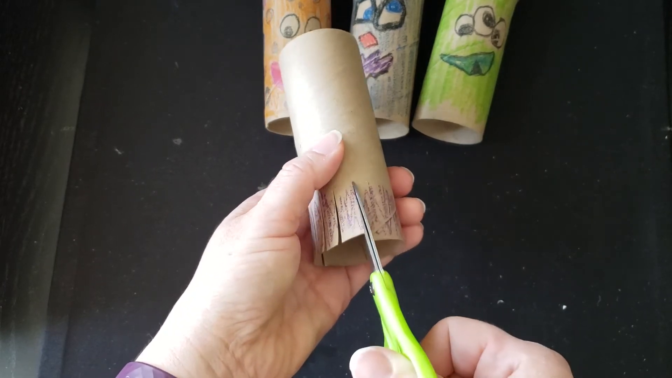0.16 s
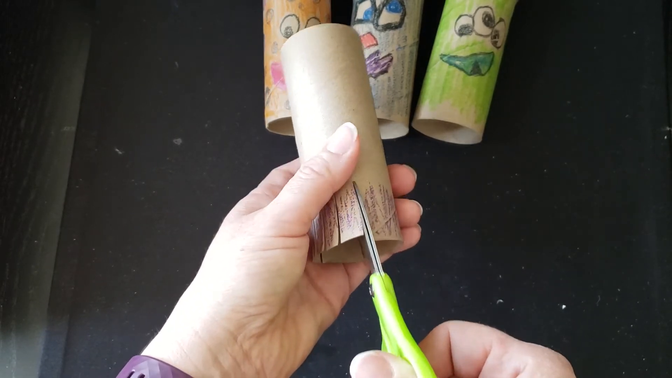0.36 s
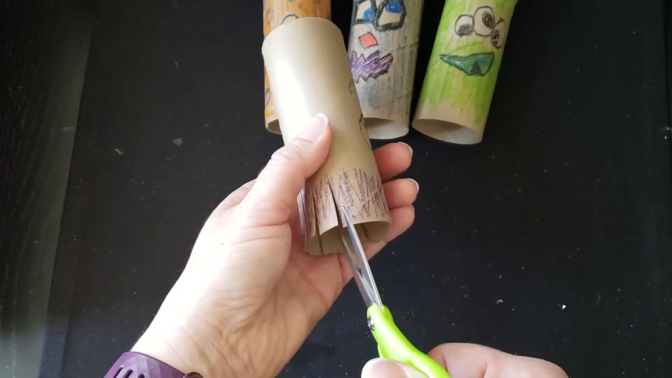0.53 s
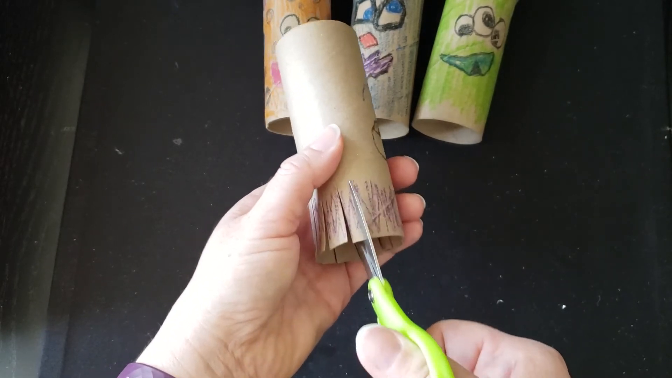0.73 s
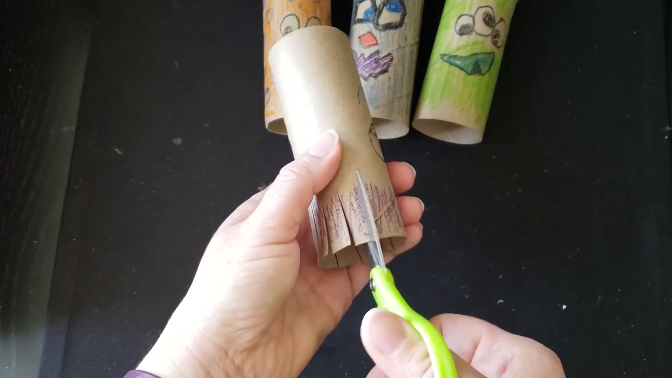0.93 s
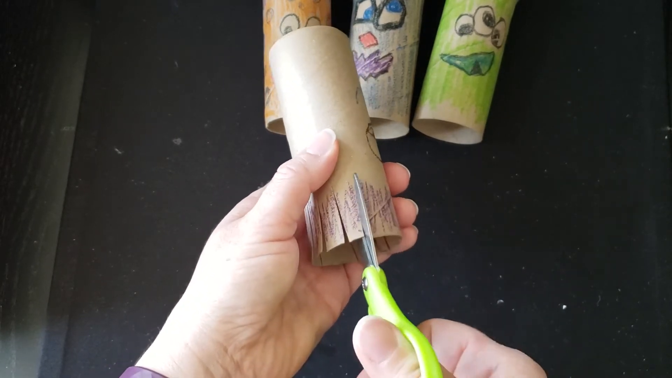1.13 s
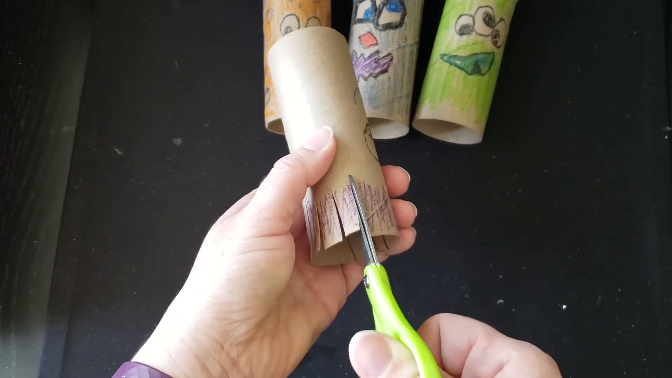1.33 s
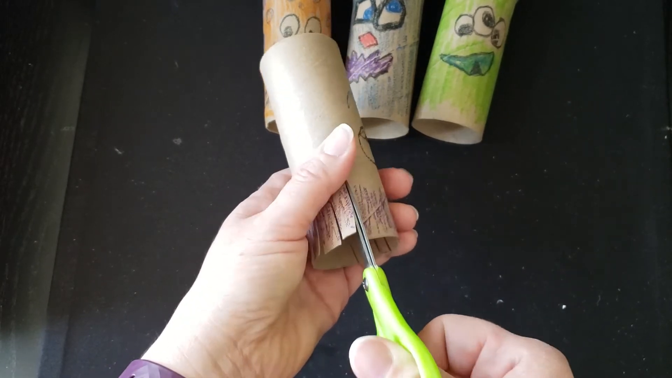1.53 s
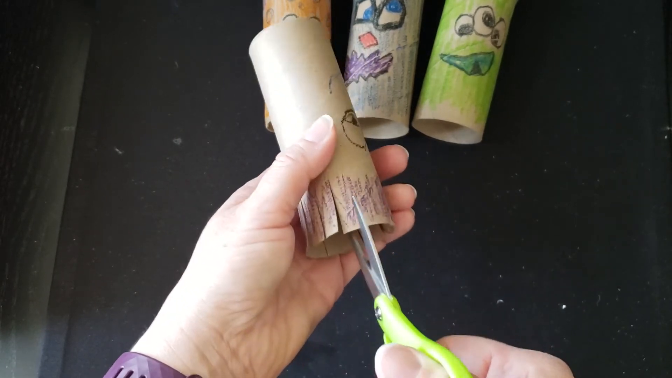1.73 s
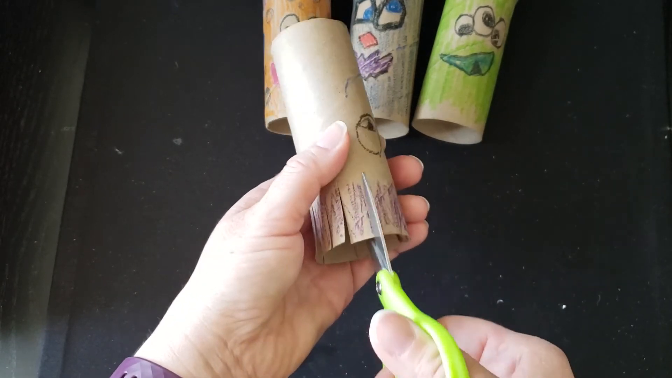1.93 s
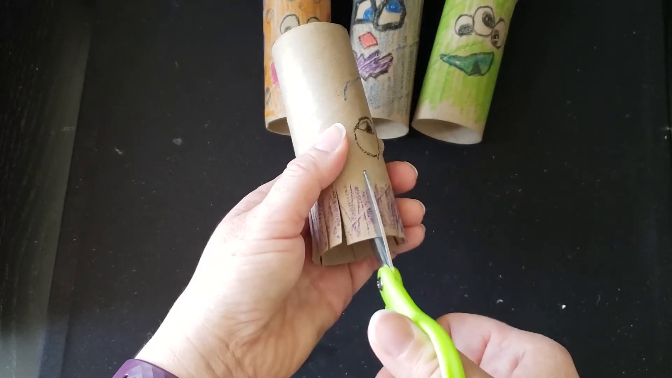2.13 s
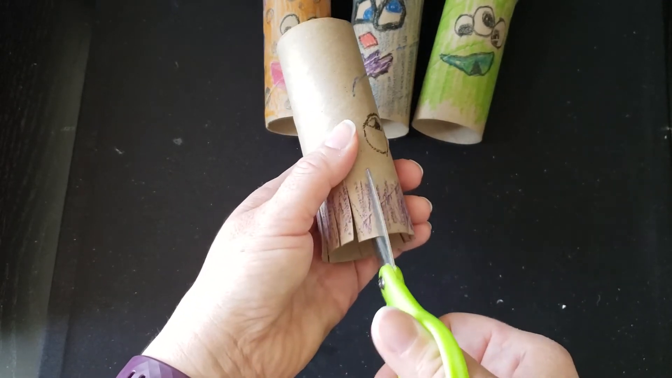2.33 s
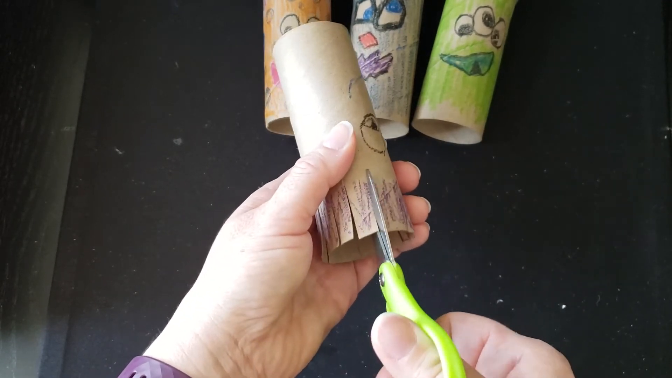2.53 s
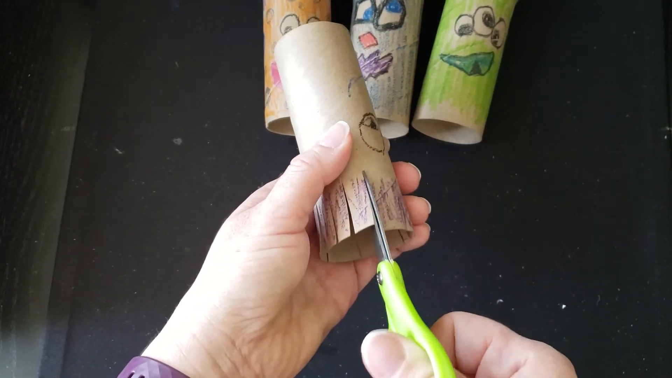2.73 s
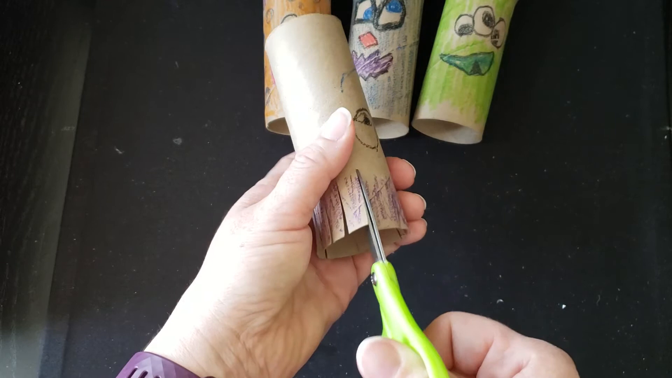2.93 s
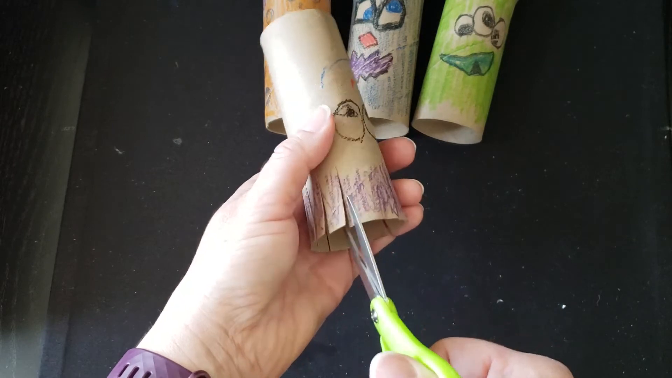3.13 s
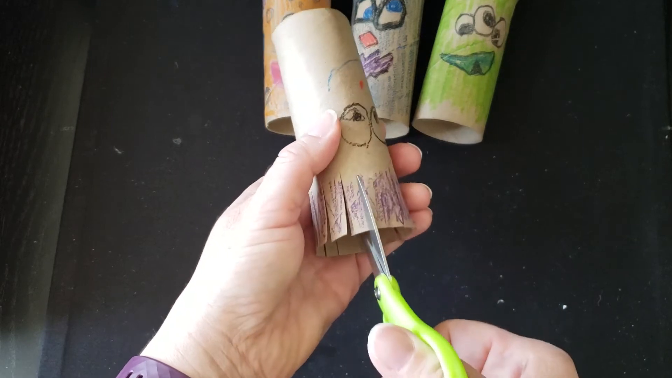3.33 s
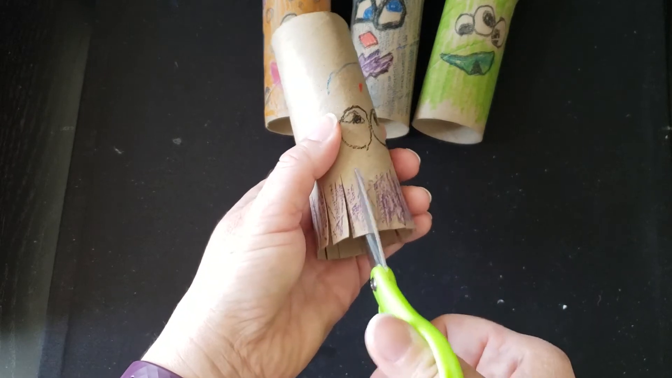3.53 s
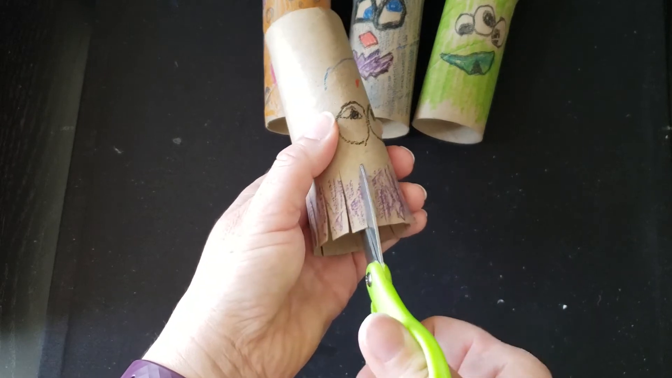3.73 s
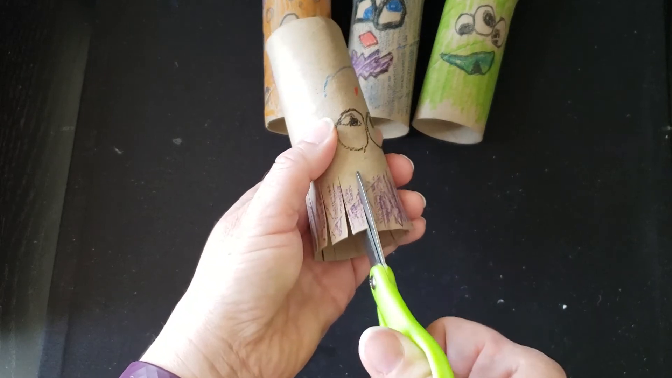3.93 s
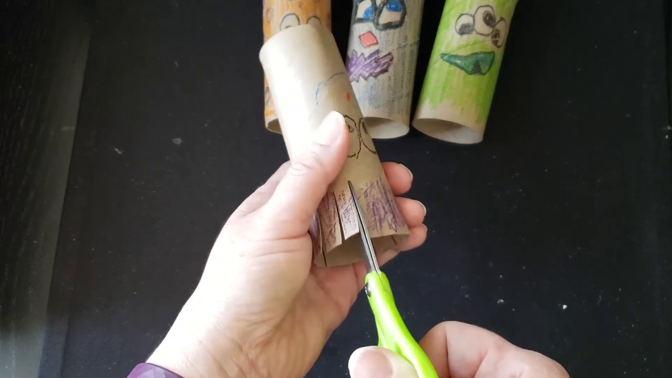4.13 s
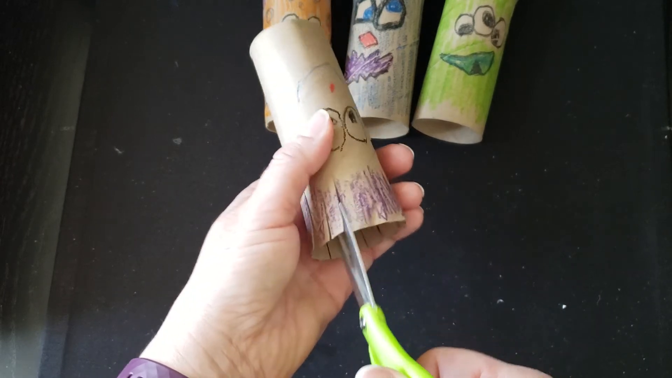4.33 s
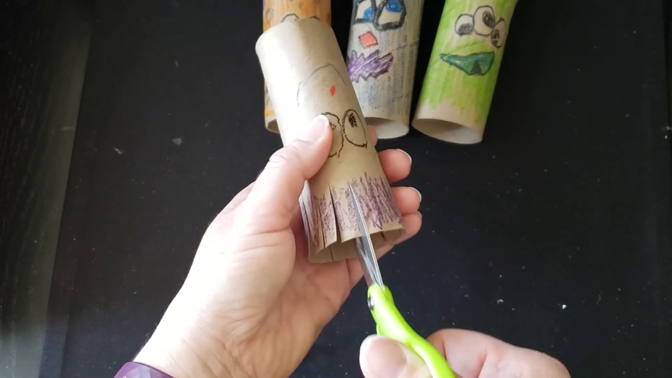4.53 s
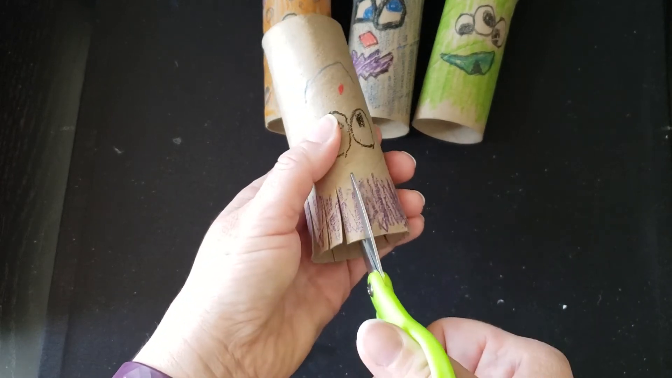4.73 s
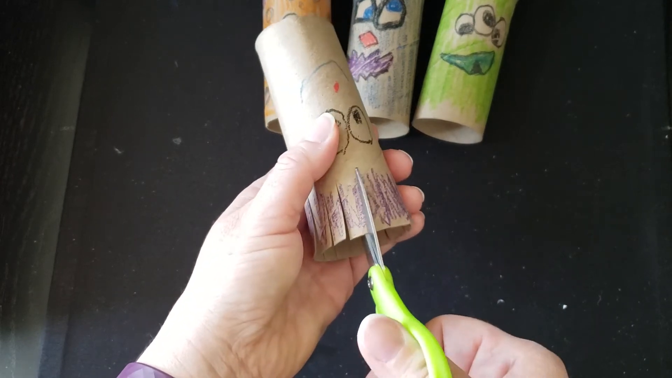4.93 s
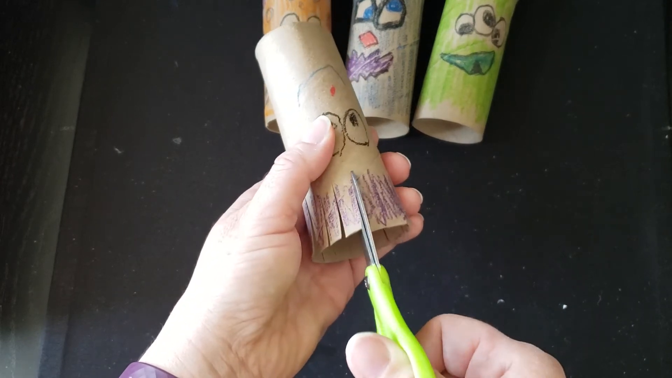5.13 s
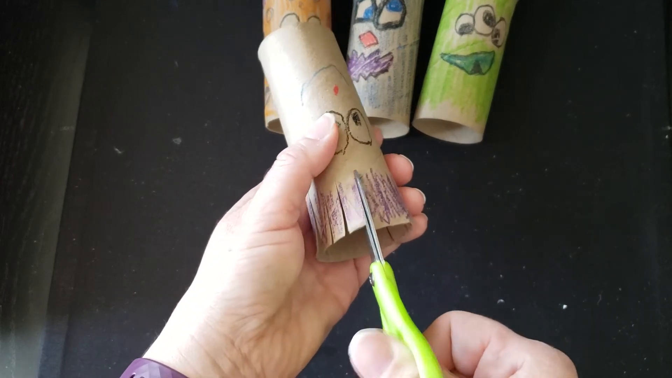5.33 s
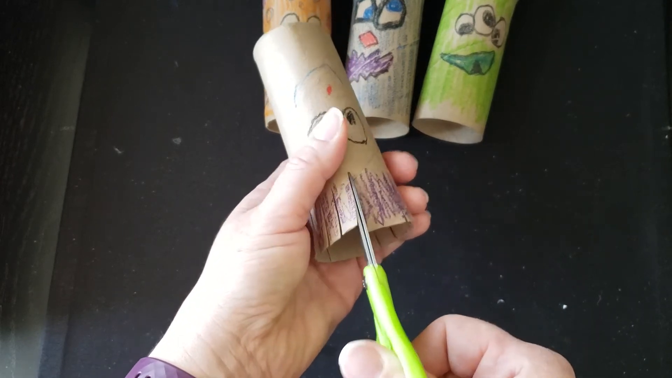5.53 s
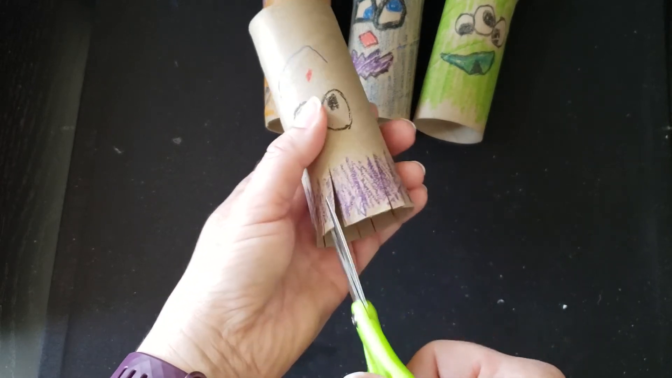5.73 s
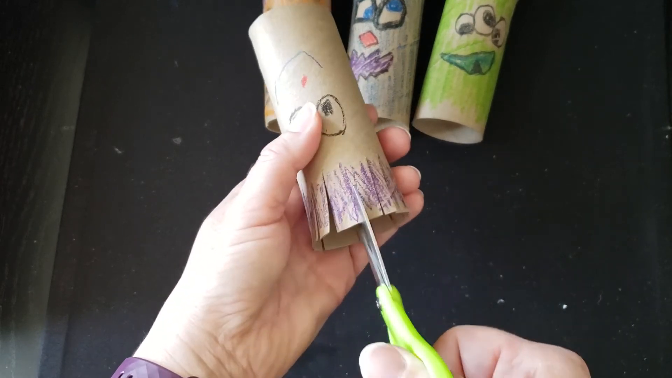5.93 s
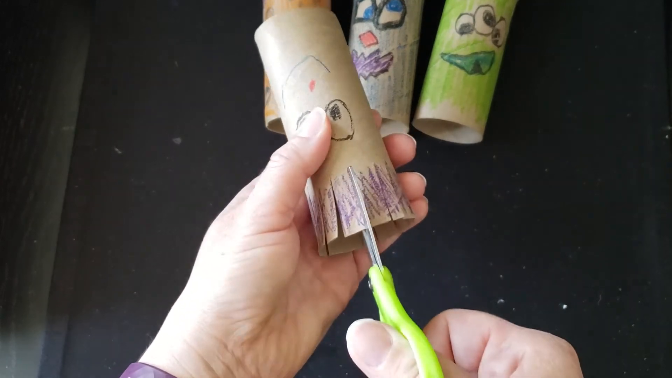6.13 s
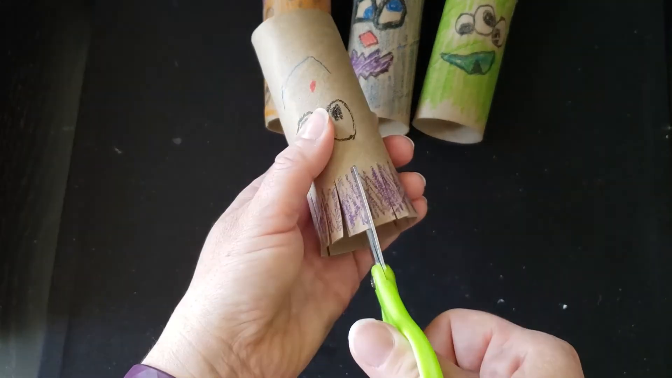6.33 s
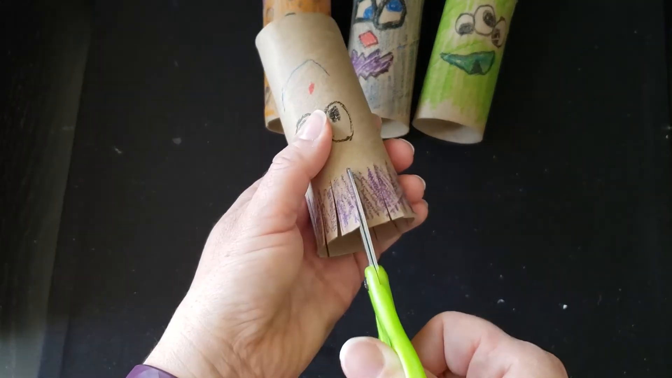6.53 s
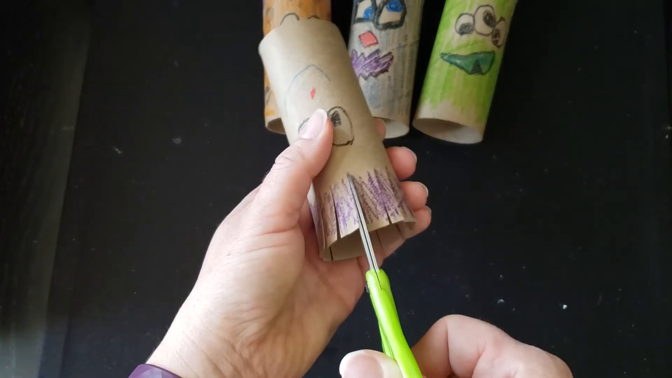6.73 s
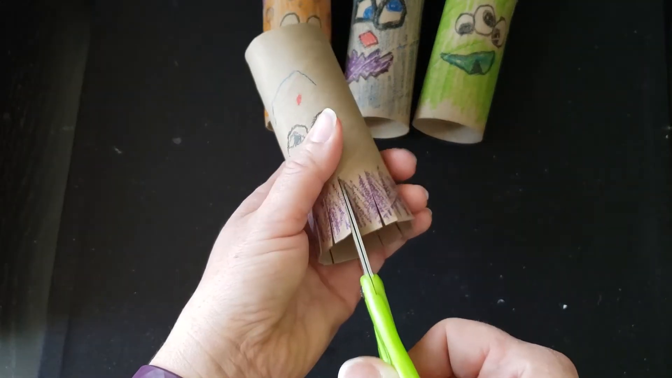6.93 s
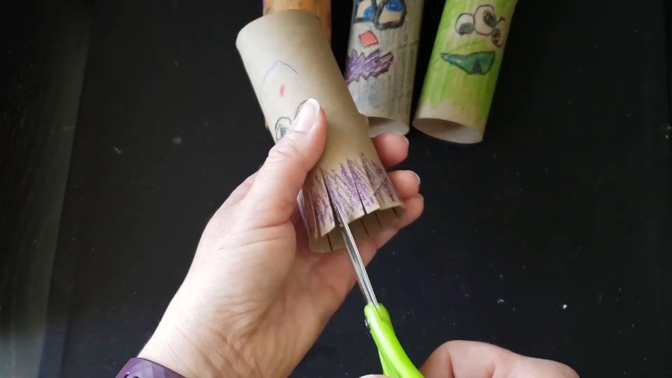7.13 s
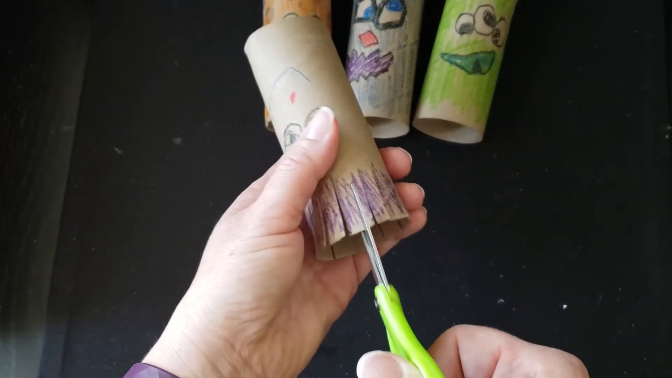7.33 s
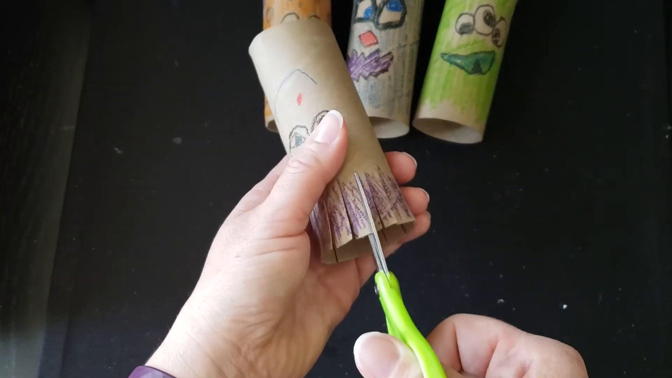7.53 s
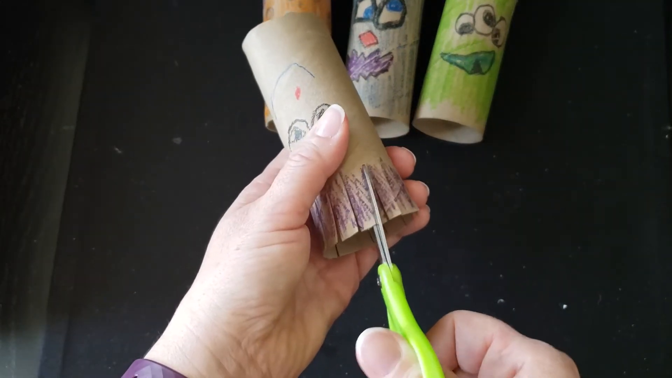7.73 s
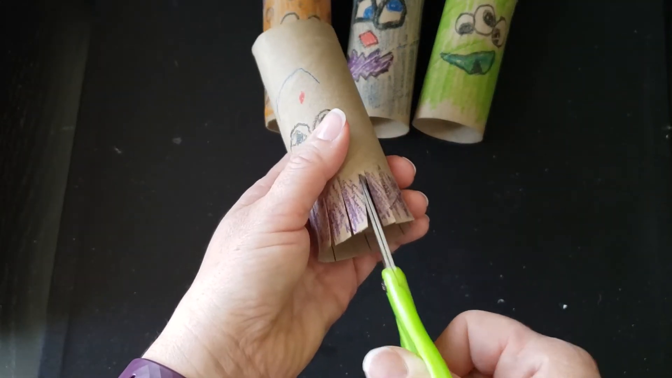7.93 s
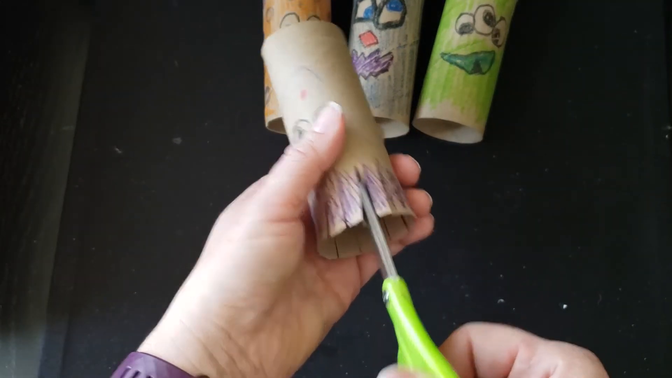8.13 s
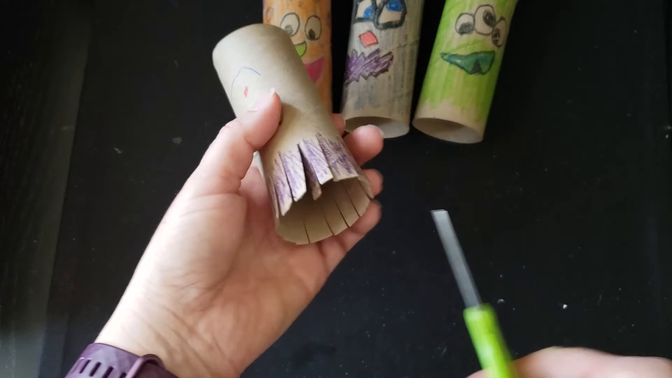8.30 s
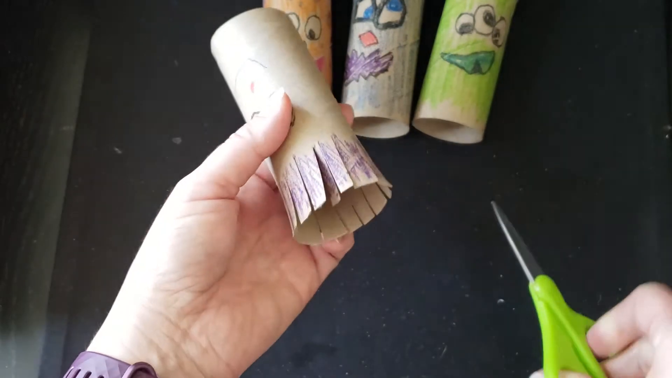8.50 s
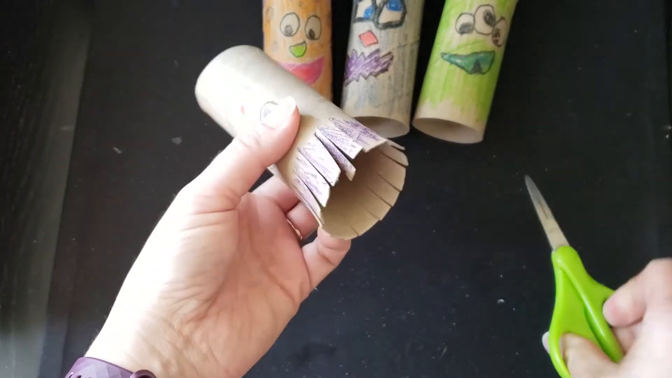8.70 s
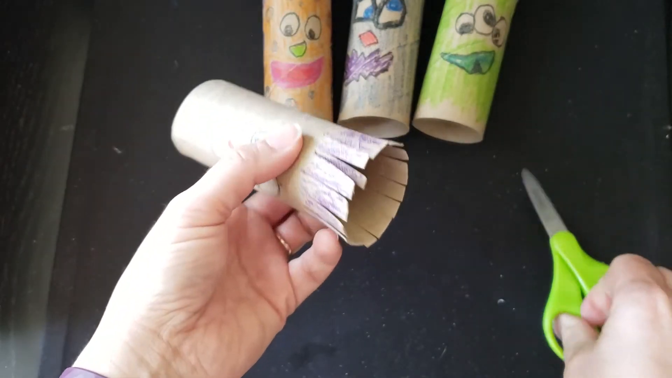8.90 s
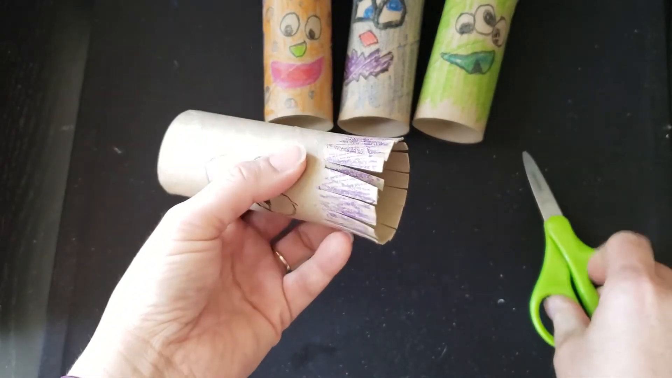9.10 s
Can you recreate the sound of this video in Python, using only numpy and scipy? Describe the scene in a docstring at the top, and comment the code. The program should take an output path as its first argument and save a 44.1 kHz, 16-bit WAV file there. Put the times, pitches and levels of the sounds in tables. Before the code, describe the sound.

Small scissors cut into a cardboard tube seven times, a little over a second apart. Each cut is a quick run of crisp, slightly hollow crackles that ends in a sharper snap of the blades. Between cuts, fingers and blades rub softly over the card, and a few light taps follow at the end. The microphone is close, in a quiet room with a faint low rumble and hum.

```python
"""Scissors cutting a cardboard tube

Small scissors cut the rim of a cardboard tube, just under a phone in a quiet room. The blades move
in short slips that tear the card and ring the air in the tube, then snap shut. Between cuts, fingers
and blades rub over the card and tap it lightly. The house rumbles and hums faintly."""
import sys
import numpy as np
from scipy import signal
from scipy.fft import rfft, irfft, next_fast_len
from scipy.io import wavfile
from scipy.ndimage import uniform_filter1d, map_coordinates

SR = 44100
rng = np.random.default_rng(int(sys.argv[2]) if len(sys.argv) > 2 else 0)


def transcribe(u):
    """Save the signal u as a 16-bit wav file named by the first command-line argument.

    u: samples, shape (n,) or (channels, n), limited to [-1, 1]; the rate is SR.
    q: integer samples, one column per channel.
    """
    v = np.clip(np.atleast_2d(u).T, -1, 1)
    q = np.round(v * 32767).astype(np.int16)
    wavfile.write(sys.argv[1], SR, q)


N = 408366
HISS_TOP_HZ = 14650

# Slips and snaps of the blades: start_s, tear_db, tube_over_tear_db, wall_over_tear_db, length_s
BLADE_SLIPS = [(0.027, -44, -4, -11.5, 0.0023), (0.065, -42.5, -7.5, -14.5, .0085),
               (.098, -43, -16, -8.5, 0.01), (0.13, -39.5, -4.5, -8.5, 0.015),
               (0.1574, -37.5, -11.5, -9.5, 0.0021), (0.171, -41.5, -6, -18, 0.0025),
               (0.192, -35, -6, -12, .0018), (0.2098, -33, -3.5, -7.5, .0053),
               (.2202, -39.5, -2, -5, 0.0055), (0.245, -29.5, -6, -4.5, 0.0082),
               (.43, -61, -10, -10.5, 0.0019), (1.155, -52, -10.5, -20, 0.0056),
               (1.185, -52, -10, -5, 0.0086), (1.228, -43.5, -18, -15, .0063),
               (1.2409, -35.5, -7.5, -0.5, 0.0028), (1.27, -41, -8, -6.5, 0.0058),
               (1.292, -51, -1.5, 0, .0097), (1.311, -40.5, -3, -10, 0.0041),
               (1.323, -41, -5, -12.5, 0.0042), (1.3521, -35.5, -9, -12, .003),
               (1.374, -36.5, -8, -6, 0.00093), (1.3878, -40, 0.5, -8, 0.01), (1.419, -42, -1, -6, 0.0055),
               (1.435, -40.5, 2.5, -4, 0.0076), (1.451, -38, -5.5, -10.5, 0.007),
               (1.488, -30, 5, 0.5, 0.0014), (2.587, -50.5, 0, -19, 0.01), (2.611, -46.5, 0, -4.5, 0.016),
               (2.633, -46, -19, -6, 0.0013), (2.647, -40.5, -8.5, -10, 0.0009),
               (2.743, -33.5, -3.5, -8.5, 0.0085), (2.7737, -32, -15.5, -11, 0.004),
               (2.802, -35.5, -5, -8, .0062), (2.817, -40, -6, -5, .0056), (2.8473, -31, 1.5, -5, 0.0065),
               (3.82, -53, -2, -8.5, 0.0045), (3.8485, -38.5, -5.5, -9, 0.0013),
               (3.86, -40.5, 0.5, -4, 0.0068), (3.8796, -37, 1, -1.5, 0.003),
               (3.894, -43.5, 3.5, 9, 0.0025), (3.904, -44, 0, -10, 0.0055), (3.929, -36, -3, -10.5, .0042),
               (4.022, -46, -17.5, -18, .0024), (4.06, -26, -5, -4, .0061), (4.102, -26.5, 4, -4, 0.0024),
               (5.08, -45.5, -10, -12, 0.0077), (5.11, -54, -4, -11.5, .004),
               (5.13, -44.5, -1.5, -3.5, .0027), (5.15, -40, -1, -10, 0.0013), (5.181, -45, -5, -6, 0.0075),
               (5.2108, -40, 3.5, -16, 0.0026), (5.24, -38, -1.5, -15.5, .011),
               (5.258, -49, -8.5, -14, 0.0023), (5.3, -58.5, -7, -14, .002), (5.33, -55, -14, -15, .002),
               (5.4489, -23, -4.5, -10.5, 0.0066), (5.694, -50.5, -27, -30, 0.0017),
               (6.54, -49, -10, -14, .0032), (6.5607, -42, -4.5, -13.5, 0.0044),
               (6.58, -44.5, -2, -5.5, .005), (6.594, -53, -8, -4, .004), (6.616, -46, 0.5, -4, .003),
               (6.637, -40, -3.5, -8, 0.011), (6.657, -39, -6, -8, .0023), (6.674, -41.5, -8.5, -10, .0023),
               (6.683, -40.5, -4.5, -17.5, 0.0027), (6.6903, -39.5, -1, -7, 0.007),
               (6.724, -31, -6.5, -9.5, 0.0051), (6.743, -37, -3.5, -7.5, .0037),
               (6.784, -41.5, -9.5, -11, 0.0029), (6.83, -51, -13, -10, .002),
               (6.8626, -29.5, 5.5, -5.5, 0.0017), (7.705, -70.5, -10.5, -7, .002),
               (7.851, -56, 6.5, 6.5, 0.0038), (7.882, -54, 14.5, 5.5, 0.0018),
               (7.907, -44, -9, -5, 0.0099), (7.919, -56, 5, -5, 0.0084), (7.935, -40.5, -8, -9, 0.0071),
               (7.9484, -44.5, 1, -11, .0039), (7.9585, -51, -1, -6, 0.0039), (7.973, -39, -5, -11, .0053),
               (7.9957, -32.5, -4, -4.5, 0.0068), (8.265, -55.5, 9, 5.5, 0.0028),
               (8.292, -63, 9.5, 3.5, 0.0034), (9.061, -63, -22.5, -28, 0.0012)]
# How the air in the tube, the card wall and the hand with the handles ring: pitch_hz, width_hz, level_db
AIR_RINGS = [(1060, 200, -19), (1205, 90, -7), (1360, 150, 0)]
WALL_RINGS = [(2180, 520, 0), (2467, 560, 4), (3280, 1310, -6), (5125, 1300, -6), (6665, 340, -2.5)]
HAND_RINGS = [(362, 150, 5.5), (646, 430, 0)]


def cuts_and_taps():
    """Each contact is a burst of noise, heard as tearing fibres and as ringing of tube, wall and hand."""
    size, lead = 3072, 128  # in samples
    t, hz = (np.arange(size) - lead) / SR, np.fft.rfftfreq(size, 1 / SR)
    out = np.zeros((2, N + size))
    for start_s, length_s, *levels_db in contacts():
        length_s = max(length_s, 1e-3)
        swell = np.clip(t / (0.55 * length_s), 0, 1) ** 0.55
        fading_s = np.maximum(t - 0.71 * length_s, 0)
        fraying = amp(-30 - 60 * fading_s / 0.27)  # the cut edge frays on
        burst = swell * (amp(-60 * fading_s / 0.015) + fraying)
        clumps = amp(12 * uniform_filter1d(rng.standard_normal(size), size=30))  # fibres part in clumps
        # every contact rings each pitch a little louder or softer
        air_db, wall_db, hand_db = (rng.normal(0, 4, len(rings))
                                    for rings in (AIR_RINGS, WALL_RINGS, HAND_RINGS))
        wall_tone = card_wall(hz, wall_db) / (1 + 1j * hz / 5000)  # a crack shakes it less above 5000 Hz
        tones = np.array([tearing(hz), tube_air(hz, air_db), wall_tone, ringing(HAND_RINGS, hand_db)(hz)])
        crackle = burst * clumps * rng.standard_normal((4, 2, size))
        parts = irfft(rfft(crackle) * tones[:, None], size)
        parts /= np.sqrt(np.sum(parts ** 2, axis=2, keepdims=True) / np.sum(burst ** 2))  # equal energy
        first = round(start_s * SR) - lead
        out[:, first:first + size] += np.tensordot(amp(levels_db), parts, axes=1)
    return out[:, :N]


def contacts():
    """Lists every slip, tap and bump: start_s, length_s, tear_db, tube_db, wall_db, hand_db."""
    # Light taps on the tube: start_s, tube_db
    light_taps = [(4.874, -53.5), (6.298, -62), (8.554, -53), (8.769, -54), (9.09, -61.5), (9.228, -49)]
    # The hand shifts its grip: start_s, hand_db
    grip_shifts = [(7.41, -63.5), (7.46, -67), (8.985, -67.5)]
    tap_s, bump_s = 0.0052, 0.082
    # a slip knocks the hand by its own force and by the tube's answer
    cuts = [(s, length_s, db, db + tube_db, db + wall_db, db - 10 + 0.7 * tube_db)
            for s, db, tube_db, wall_db, length_s in BLADE_SLIPS]
    taps = [(s, tap_s, db - 23, db, db - 25, db - 32) for s, db in light_taps]
    bumps = [(s, bump_s, db - 34.5, db - 28, db - 34.5, db) for s, db in grip_shifts]
    return cuts + taps + bumps


def tearing(hz):
    """Tearing fibres sound very bright."""
    # Tone of the tear: pitch_hz, level_db
    tear_tone = [(4410, -37.5), (7500, -15.5), (8070, -13), (9470, -1.5), (10600, -0.5), (11100, 3.5),
                 (13100, 2.5), (15000, -10.5), (15600, -38.5)]
    return colour(tear_tone)(hz)


def tube_air(hz, change_db=0):
    """The air in the tube rings around one note and is weak above and below it."""
    return ringing(AIR_RINGS, change_db)(hz) * ringing([(1230, 620, 0)])(hz)


def card_wall(hz, change_db=0):
    """The card wall rings broadly and swallows the highest treble."""
    return ringing(WALL_RINGS, change_db)(hz) / (1 + (hz / 8500) ** 6)


def rubbing():
    """Skin and steel drag over the rough card in fine grains, lumpier the harder they press."""
    # Tone of the rubbing hiss: pitch_hz, level_db
    hiss_tone = [(4410, -30), (7500, -17), (8060, -18.5), (9140, -2), (11100, -6.5), (12700, 1.5),
                 (14600, -10.5)]
    hiss_db, tube_db, wall_db = rubbing_levels()
    pressure = np.clip((hiss_db + 73) / 18, 0.2, 1.3)
    grain_db = pressure * (3.8 * wobble(90) + 2 * wobble(500))
    snaps = (rng.random(N) < 45 / SR) * rng.exponential(0.5, N)  # about 45 single fibres a second
    snap_fade = amp(-60 * np.arange(200) / SR / 0.0013)
    grain = amp(grain_db) * (1 + np.convolve(snaps, snap_fade)[:N])
    hollow = noise(grain * amp(tube_db + 3.3 * wobble(30)), tube_air)
    hiss = noise(grain * amp(hiss_db), colour(hiss_tone, HISS_TOP_HZ))
    rasp = noise(grain * amp(wall_db), card_wall)
    thud = noise(amp(grain_db + wall_db - 9.5), ringing(HAND_RINGS))  # the grip shakes with the card
    return hollow + thud + patchy(hiss + rasp, depth_db=4)


def rubbing_levels():
    """Hiss, tube and wall levels in dB: strokes rise, hold and fall, and each slip leaves a fading drag."""
    # Strokes along the card: peak_s, rise_s, hold_s, hiss_db, tube_over_hiss_db, wall_over_hiss_db
    strokes = [(.004, .01, 0, -55.5, 0.5, -13), (.214, .2, 0, -51, -11, -18),
               (0.495, .02, 0.027, -60, 0, -6.5), (0.612, 0.051, 0.059, -66.5, -6.5, -3),
               (0.866, 0.022, 0.041, -68.5, -0.5, -4.5), (1.146, .04, 0.037, -65.5, -10, -9.5),
               (1.231, .05, .03, -61.5, -4, -3), (1.344, .1, 0.062, -56, -12.5, -6.5),
               (1.7, 0.017, 0.038, -60.5, 0, -4), (1.753, .05, 0.056, -65, -7.5, -4),
               (2.053, .02, .07, -72, -1, -4), (2.173, 0.019, 0.015, -67.5, -11, -13),
               (2.292, .05, 0.016, -81.5, 6, -3), (2.433, 0.017, 0.019, -67, -4, -7.5),
               (2.599, .04, .05, -57.5, -2.5, -6), (2.76, 0.019, 0.031, -54.5, -0.5, -1.5),
               (3.09, 0.024, .03, -59.5, -3, -6), (3.169, 0.043, 0.071, -65, -3, -2.5),
               (3.41, 0.02, .14, -78.5, 12, -4.5), (3.665, .03, 0.018, -76.5, -3, -5),
               (3.83, 0.013, .09, -60.5, -5, -4), (4.358, 0.049, 0.024, -60, 6.5, -7.5),
               (4.398, .06, .07, -66.5, -4.5, 1), (4.622, .02, 0.12, -65, -1.5, -7),
               (4.812, 0.069, 0.042, -66.5, -0.5, -8.5), (5.088, 0.068, .12, -58, -5, -8),
               (5.329, 0.16, 0.13, -72.5, -13, -31), (5.718, .035, .04, -58.5, -1.5, -4.5),
               (5.781, .05, 0.056, -66, 7.5, 1), (6.185, 0.052, 0.043, -68.5, -6.5, -10.5),
               (6.561, 0.023, .05, -57.5, -3, -7), (6.688, 0.087, .01, -58.5, -5, -1),
               (6.808, 0.079, 0.014, -69, -19, -11), (7.095, 0.055, 0.01, -60, -1.5, -5.5),
               (7.331, 0.016, 0.015, -73, 14, -1.5), (7.476, 0.034, .03, -85.5, 13, -7),
               (7.55, .05, 0.026, -69.5, 3, -9), (7.807, .02, 0.13, -64.5, 0, -1.5),
               (7.949, 0.14, .025, -56.5, -9, -6), (8.224, .02, 0.056, -59, -9, -8.5),
               (8.547, 0.02, 0.057, -86.5, 13.5, 0.5), (8.669, 0.057, .03, -60, -5.5, -19.5),
               (8.788, .03, .04, -87.5, 15.5, -1.5), (8.959, 0.016, 0.085, -62.5, -17.5, -31),
               (9.002, .05, 0.085, -63.5, -20, -18), (9.1, 0.099, 0.17, -71.5, -13, -15.5),
               (9.228, 0.019, 0.045, -79.5, 21.5, 6.5)]
    # How fast a stroke fades: hiss_db_per_s, tube_db_per_s, wall_db_per_s
    stroke_fades = [405, 321, 399.5]
    drag_db, drag_fade_db_per_s = np.c_[[-61, -66, -62.5]], [176.5, 128.5, 177.5]  # hiss, tube, wall
    t = np.arange(0, N / SR + 0.002, 0.002)
    power = np.full((3, len(t)), 1e-13)
    for peak_s, rise_s, hold_s, hiss_db, tube_db, wall_db in strokes:
        peak_db = hiss_db + np.c_[[0, tube_db, wall_db]]
        climb_db = 25 * np.maximum(peak_s - t, 0) / rise_s
        fall_db = np.outer(stroke_fades, np.maximum(t - peak_s - hold_s, 0))
        power += amp(peak_db - climb_db - fall_db) ** 2
    for start_s, tear_db, *_, length_s in BLADE_SLIPS:
        after_s = t - start_s - length_s
        peak_db = drag_db + 1.25 * (tear_db + 31.5)  # the cut edge drags louder after a loud slip
        fall_db = np.outer(drag_fade_db_per_s, abs(after_s))
        power += (after_s > 0) * amp(peak_db - fall_db) ** 2
    return [np.interp(np.arange(N) / SR, t, 10 * np.log10(p)) for p in power]


def room_echo(x):
    """The room answers with a short echo in which low pitches last longest."""
    # Time the echo takes to fall by 60 dB: pitch_hz, fade_s
    fade_times = [(300, 0.56), (1000, 0.12), (2500, 0.062), (12000, 0.11)]
    hz, t, bands = signal.stft(rng.standard_normal((2, SR // 2)), SR, nperseg=256)
    fade = amp(-60 * t / at_pitch(fade_times, hz)[:, None])
    tail = signal.istft(bands * fade, SR, nperseg=256)[1]
    delayed = np.pad(x, (300, 0))[None]
    return signal.fftconvolve(delayed, tail / np.linalg.norm(tail[0]), axes=1)[:, :N]


def house():
    """A low rumble that comes and goes, a wavering hum and the microphones' own hiss."""
    # Strength of the two rumbles: time_s, deep_db, low_db
    rumble_levels = [(0.08, -58.5, -55.5), (1.47, -63, -59.5), (3.27, -59.5, -59.5), (3.63, -65.5, -61.5),
                     (3.91, -59, -55.5), (4.2, -67, -62), (5.12, -64.5, -61.5), (5.58, -72.5, -64),
                     (5.97, -59.5, -65.5), (6.33, -68.5, -69.5), (6.84, -68.5, -57), (7.03, -70, -65.5),
                     (7.27, -73, -67.5), (7.53, -58.0, -55), (7.84, -63.5, -66), (8.39, -71.5, -62),
                     (8.68, -56, -60.5), (9.18, -67.5, -58.5)]
    # Tones of the deep rumble, the low rumble and the microphone hiss: pitch_hz, level_db
    deep_tone = [(12, -48), (20, -7.5), (43, 5), (59, 12), (81, -13.5), (100, -10), (130, -40.5),
                 (220, -120)]
    low_tone = [(53, -31), (90, -5.5), (167, -8), (195, -12), (236, -4.5), (267, -18), (300, -11.5),
                (450, -22.5), (900, -46.5), (1170, -56), (1980, -120)]
    hiss_tone = [(400, -22.5), (550, -14), (900, -4), (1350, -2), (2200, -15), (7800, -24.5),
                 (14600, -16.5)]
    # How alike the rumble is left and right: pitch_hz, likeness (1 = the same)
    rumble_likeness = [(60, 0.95), (290, 0.83), (700, 0.088)]
    # Notes of the hum: pitch_hz, level_db
    hum_notes = [(120, -65.5), (229, -73.5), (302, -74)]
    t = np.arange(N) / SR
    time_s, *columns = np.transpose(rumble_levels)
    deep_db, low_db = (np.interp(t, time_s, column) for column in columns)
    deep = noise(amp(deep_db + 1.3 * wobble(6.6)), colour(deep_tone))
    low = noise(amp(low_db + 1.6 * wobble(8)), colour(low_tone))
    rumble = stereo(deep + low, rumble_likeness, balance=[(30, 3.5), (150, -1)])
    hum = sum(amp(db + 3 * wobble(1.9)) * np.sin(2 * np.pi * hz * t + 1.5 * wobble(5.4))
              for hz, db in hum_notes)
    hiss = noise(amp(-75.5), colour(hiss_tone, HISS_TOP_HZ))
    return rumble + hum + hiss


def amp(db):
    """Turns decibels into a number to multiply by."""
    return 10 ** (np.asarray(db) / 20)


def at_pitch(points, hz):
    """Reads a value between (pitch_hz, value) points, with octaves evenly spaced."""
    pitches, values = np.transpose(points)
    return np.interp(np.log(hz + 1), np.log(pitches + 1), values)


def wobble(per_s):
    """A smooth curve through per_s random values a second."""
    knots = rng.standard_normal(int(N * per_s / SR) + 4)
    return map_coordinates(knots, [np.arange(N) * per_s / SR])


def colour(points, top_hz=np.inf):
    """A tone (a gain for each pitch) drawn through (pitch_hz, level_db) points, silent above top_hz."""
    return lambda hz: amp(at_pitch(points, hz)) * (hz < top_hz)


def ringing(rings, change_db=0):
    """The tone of something that rings at several pitches; change_db makes each louder or softer."""
    change_db = np.zeros(len(rings)) + change_db
    return lambda hz: sum(
        (-1) ** k * amp(db + change_db[k]) * 1j * hz * width / (pitch ** 2 - hz ** 2 + 1j * hz * width)
        for k, (pitch, width, db) in enumerate(rings))


def noise(loudness, tone):
    """Two unrelated noises that follow one loudness curve, given a tone that keeps their power."""
    white = loudness * rng.standard_normal((2, N))
    size = next_fast_len(N + SR // 2)
    gains = tone(np.fft.rfftfreq(size, 1 / SR))
    return irfft(rfft(white, size) * gains / np.sqrt(np.mean(abs(gains) ** 2)), size)[:, :N]


def patchy(x, depth_db):
    """Makes bands of pitch swell and sink at random, so no two strokes sound alike."""
    bands = signal.stft(x, nperseg=256)[2]
    patches = uniform_filter1d(rng.standard_normal(bands.shape[1:]), 4, axis=0)  # smooth over pitch
    patches = uniform_filter1d(patches, 40, axis=1)  # and over time
    return signal.istft(bands * amp(depth_db * patches / patches.std()), nperseg=256)[1][:, :N]


def stereo(pair, likeness, balance):
    """Mixes two unrelated signals into left and right, with a likeness and a balance for each pitch."""
    size = next_fast_len(N + 4096)
    hz = np.fft.rfftfreq(size, 1 / SR)
    angle = np.arccos(np.clip(at_pitch(likeness, hz), -1, 1)) / 2
    middle, side = rfft(pair, size) * [np.cos(angle), np.sin(angle)]
    tilt = amp(at_pitch(balance, hz) / 2)
    return irfft(np.array([(middle + side) * tilt, (middle - side) / tilt]), size)[:, :N]


def scene():
    """Cutting and rubbing close by, the echo of the cuts and taps, and the house behind them."""
    # How alike the close sounds are left and right: pitch_hz, likeness (1 = the same)
    close_likeness = [(200, 0.99), (1350, 0.79), (3100, 0.11), (6800, -0.018), (15000, -0.47)]
    # The phone shades its left microphone: pitch_hz, left_over_right_db
    close_balance = [(60, 1.5), (150, 0), (380, -1), (950, 1.5), (2380, -5), (5980, -17), (15000, -9.5)]
    cuts = cuts_and_taps()
    close = stereo(cuts + rubbing(), close_likeness, close_balance)
    return close + amp(-13) * room_echo(cuts[0]) + house()


def record(dry):
    """The phone keeps nothing above its highest pitch."""
    top_hz = 15790
    size = next_fast_len(N + 4096)
    return irfft(rfft(dry, size) * (np.fft.rfftfreq(size, 1 / SR) < top_hz), size)[:, :N]


dry = scene()
out = record(dry)
transcribe(out)
```